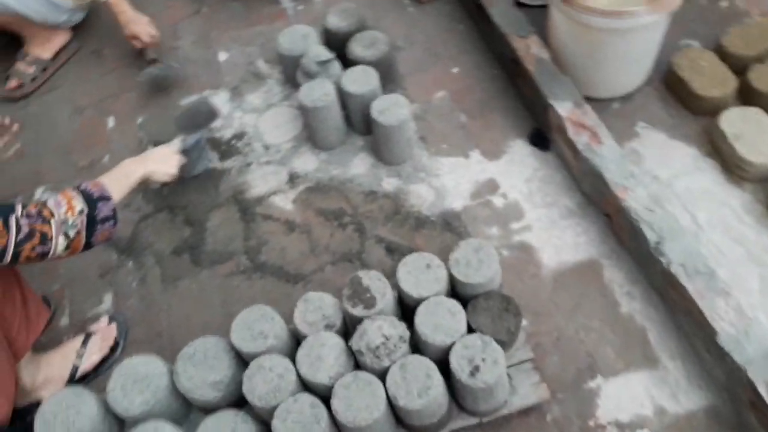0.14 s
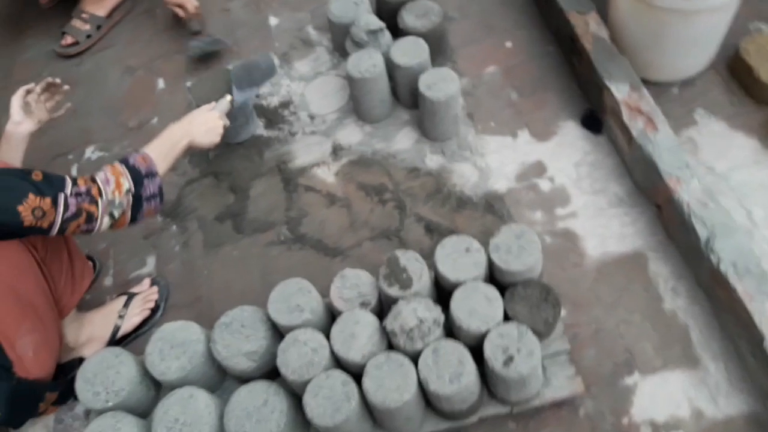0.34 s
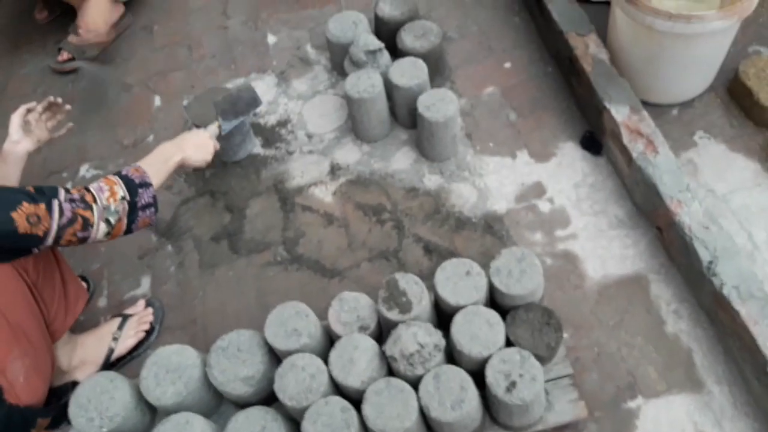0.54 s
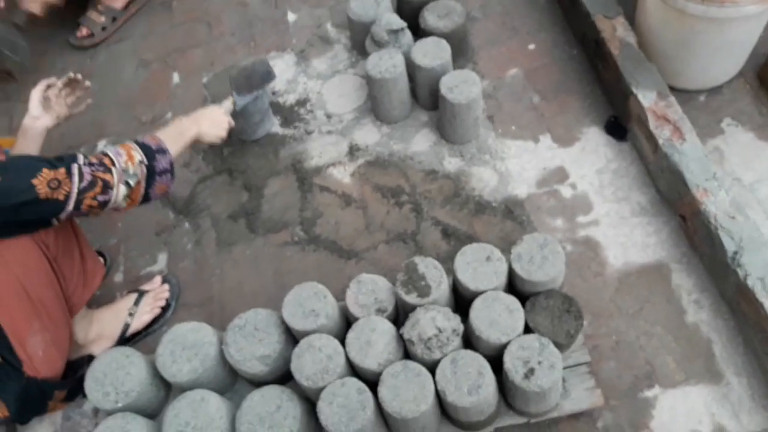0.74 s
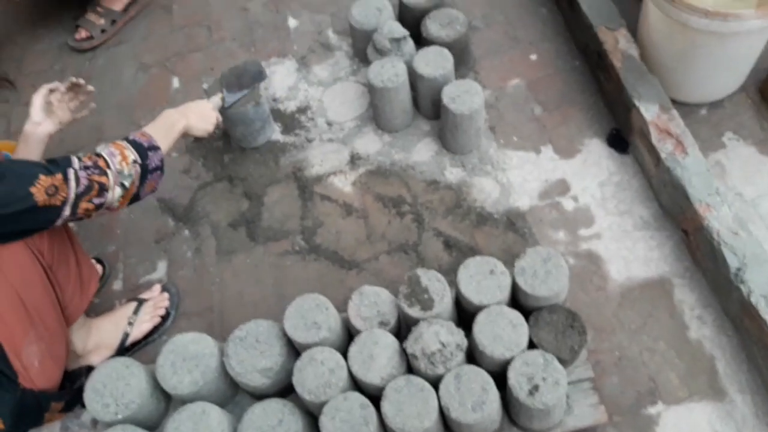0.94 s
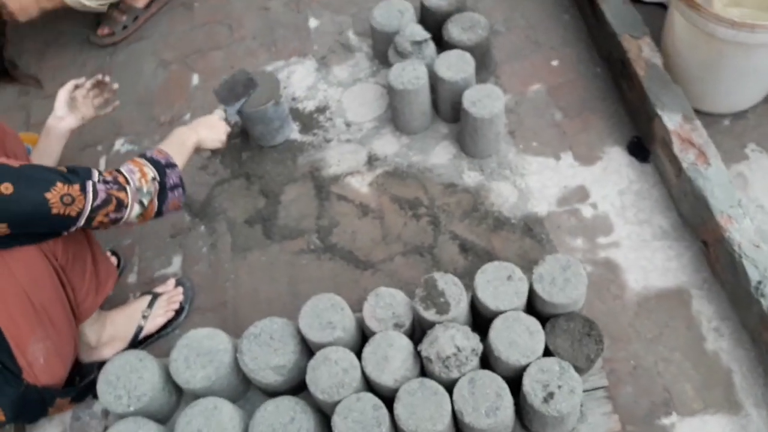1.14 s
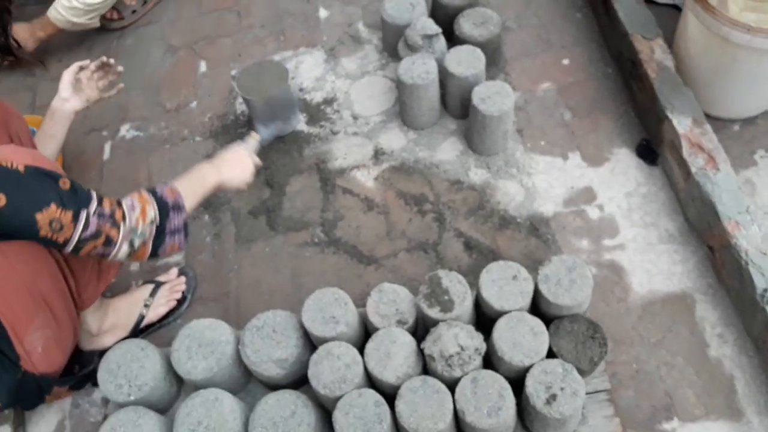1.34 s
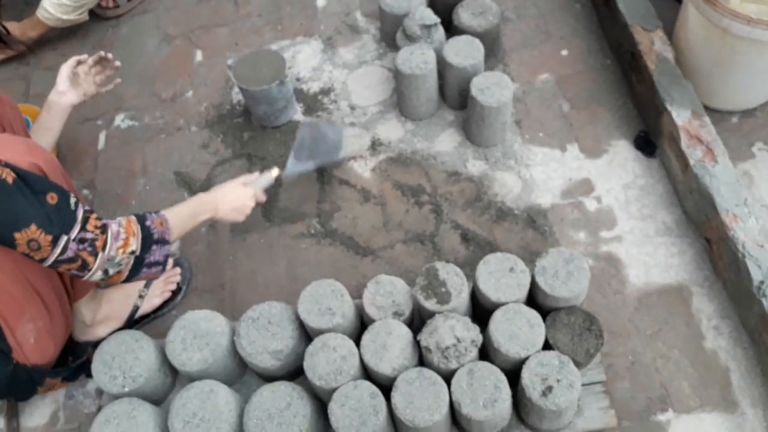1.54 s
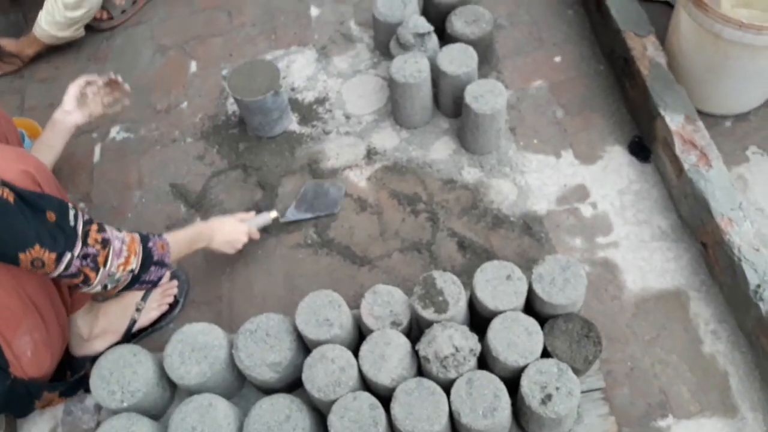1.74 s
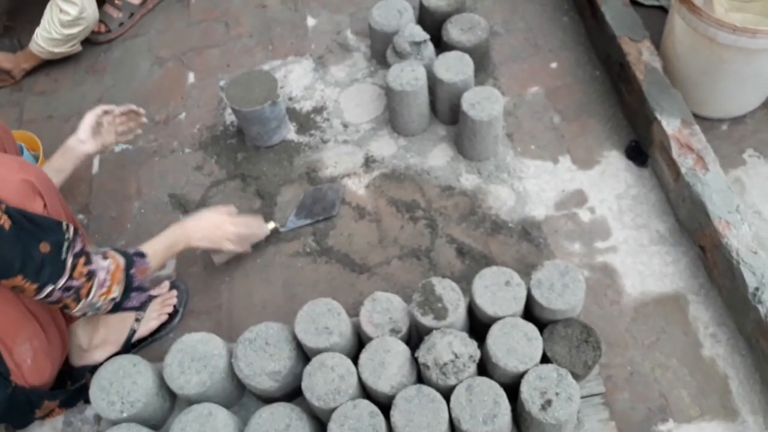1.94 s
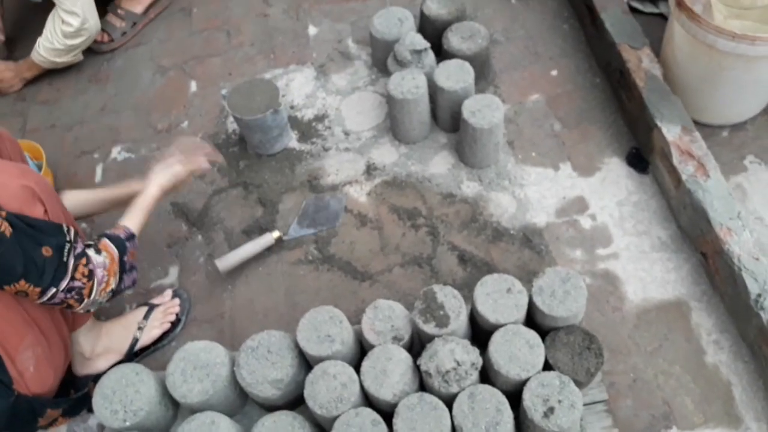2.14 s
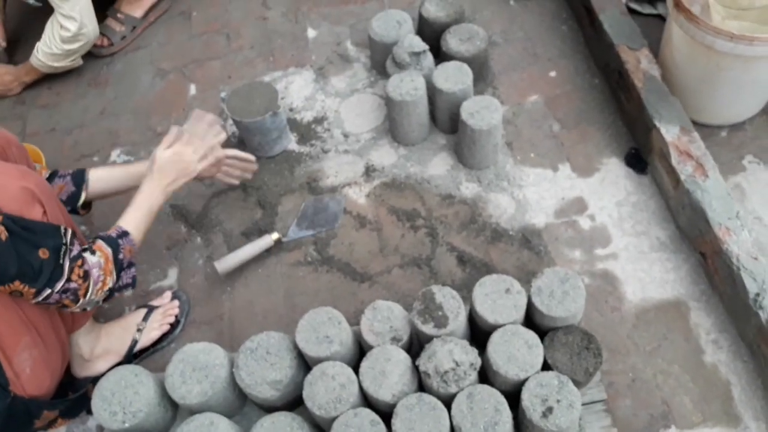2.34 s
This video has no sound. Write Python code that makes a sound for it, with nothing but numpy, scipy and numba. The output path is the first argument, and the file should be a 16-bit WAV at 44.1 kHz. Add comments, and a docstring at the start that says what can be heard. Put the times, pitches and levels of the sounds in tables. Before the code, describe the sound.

A small steel trowel skims gritty cement, strikes a sharp ringing clank with a dull thud, skims softly with light taps, then drags in loud, bright rasps over a sandy floor; close microphone in a small yard.

```python
"""A yard with a gritty hard floor and a mould of damp cement, a small steel trowel working near the microphone.
The blade pats and skims the mould, then is dragged over the floor and let go. Sand grains under its edge
ring its resonances; taps ring it harder, over a knock and a hollow thud; squeals and one squeak sing out.
A short echo of decaying noise follows; a low rumble and yard hiss lie behind.
One microphone, the same on both channels."""
import sys
import numpy as np
from scipy import signal
from scipy.fft import rfft, irfft
from scipy.io import wavfile
from scipy.ndimage import uniform_filter1d
from numba import njit

SR = 44100
rng = np.random.default_rng(int(sys.argv[2]) if len(sys.argv) > 2 else 0)


def wav_record(signal):
    """Record a signal, one row per channel, as 16-bit PCM in the file named by sys.argv[1]."""
    frames = np.transpose(np.atleast_2d(signal))
    bounded = np.clip(frames, -1, 1)
    # unit amplitude maps onto the largest positive 16-bit level
    quanta = np.round(bounded * 32767).astype(np.int16)
    wavfile.write(sys.argv[1], SR, quanta)


N = 110250  # samples, 2.5 s
TIME_S = np.arange(N) / SR


def undb(db):
    """Amplitude ratio of a level in dB."""
    return 10 ** (np.asarray(db) / 20)


def unit(x):
    """Scale a signal to an RMS of 1."""
    return x / np.sqrt(np.mean(x ** 2))


def curve(rows, col):
    """Straight lines over time through one column of a table whose first column is t/s."""
    rows = np.array(rows)
    return np.interp(TIME_S, rows[:, 0], rows[:, col])


def colour(x, points):
    """Shape a spectrum by (f/Hz, gain/dB) points on a log frequency axis; -90 dB outside them."""
    hz = np.fft.rfftfreq(len(x), 1 / SR)
    points = np.array(points)
    gain_db = np.interp(np.log(hz + 1), np.log(points[:, 0]), points[:, 1], -90, -90)
    return irfft(rfft(x) * undb(gain_db), len(x))


def walk(rate):
    """Random levels held 1 / rate s and slewed twice; spread near 1."""
    hold = int(SR / rate)
    levels = rng.standard_normal(N // 100)[:N // hold + 1]
    steps = np.repeat(levels, hold)
    return 1.18 * uniform_filter1d(uniform_filter1d(steps, hold), hold)[:N]


@njit
def ring(x, hz, width):
    """One resonance whose centre may move, as a two-state bandpass; gain 1 at the centre."""
    y, band, low = np.empty(len(x)), 0., 0.
    for i in range(len(x)):
        g, damping = np.tan(np.pi * hz[i] / SR), width / hz[i]
        v = (band + g * (x[i] - low)) / (1 + g * (g + damping))
        band, low, y[i] = 2 * v - band, low + 2 * g * v, damping * v
    return y


def decay(start, t60):
    """Sudden start, then an exponential fall of 60 dB in t60 s."""
    t = TIME_S - start
    return (t >= 0) * np.exp(-np.log(1000) * np.maximum(t, 0) / t60)


def swell(u):
    """Fade in and out as u goes from 0 to 1."""
    return np.sqrt(np.sin(np.pi * u).clip(0))


def split(x):
    """Mids, body and treble of the blade's sound, parted at 2450 and 9000 Hz, each at RMS 1."""
    spectrum, hz = rfft(x), np.fft.rfftfreq(N, 1 / SR)
    low = 1 / (1 + (hz / 2450) ** 12)
    high = 1 / (1 + (9000 / (hz + 1)) ** 12)
    return [unit(irfft(spectrum * gain, N)) for gain in (low, 1 - low - high, high)]


GRAINS_PER_S, GRAIN_SCATTER_DB = 5000, 3
SMOOTH_DB = -7.5  # the smoother rub against the grains


def grit():
    """Dense sand grains of scattered size and random sign, over a smoother rub of white noise."""
    size_db = GRAIN_SCATTER_DB * np.minimum(rng.exponential(size=N), 3)
    struck = rng.random(N) < GRAINS_PER_S / SR
    grains = struck * rng.choice([-1, 1], N) * undb(size_db)
    return unit(unit(grains) + undb(SMOOTH_DB) * rng.standard_normal(N))


FLICKER_PER_S = 20
DRIFT = .003  # spread, as a share of each pitch
CLIMB_HZ = 6000  # tones between this and 9 kHz take the climb


def blade(x, modes, flicker_db, climb=0):
    """Each resonance drifts a little and swells on its own as the contact moves."""
    out = 0
    for k, (f, width_hz, db) in enumerate(modes):
        level = undb(db + flicker_db * walk(FLICKER_PER_S))
        hz = f * (1 + DRIFT * walk(4.5) + climb * (CLIMB_HZ < f < 9000))
        out = out + (-1) ** k * level * ring(x, hz, 1. * width_hz)  # neighbours have opposite sign
    return out


# blade resonances while skimming the mould: [f/Hz, width/Hz, level/dB]
BLADE_FREE = [(1150, 250, -24), (2000, 120, -22), (3130, 140, -9), (3710, 60, -10), (4500, 70, -7),
              (4970, 75, -5), (5390, 50, -9), (5770, 55, -5), (6300, 90, 0), (7050, 200, -9),
              (8150, 100, -19), (11300, 300, -20), (12900, 80, -16), (13700, 200, -10), (14400, 150, -12),
              (15450, 120, -17)]
# blade resonances while pressed on the floor: [f/Hz, width/Hz, level/dB]
BLADE_PRESSED = [(1090, 90, -13), (1420, 160, -15), (2000, 130, -11), (3080, 150, -10), (3440, 120, -7),
                 (3750, 150, -9), (4450, 150, -8), (4910, 180, -6), (6720, 130, -2), (7180, 150, -1),
                 (8770, 200, -19), (9930, 200, -17), (11450, 250, -16), (12800, 300, -15),
                 (14800, 200, -11), (15300, 180, -11)]
# spectrum of the sand's own rasp: [f/Hz, relative level per Hz/dB]
RASP = [(410, -37), (700, -21), (1090, -20), (1700, -18.5), (2540, -11.5), (3340, -7.5), (5540, -5),
        (7010, -4.5), (8300, -20), (14900, -16), (15700, -9.5)]
# spectrum of the dull knock: [f/Hz, relative level per Hz/dB]
KNOCK = [(150, -17.5), (300, 0.5), (560, -6.5), (850, -9.5), (1300, -15), (2000, -61.5)]
# the edge catches on a lump: [t/s, jolt level/dB, bump level/dB]
CATCHES = [(.09, -32, -53), (0.118, -36.5, -50), (.1965, -28.5, -72), (1.244, -26.5, -58),
           (1.314, -25, -42), (1.382, -20.5, -65), (1.5196, -26, -43), (1.64, -27.5, -67),
           (1.727, -14.5, -41), (1.853, -31, -63), (1.932, -16.5, -43), (1.986, -17.5, -53),
           (2.082, -14, -59), (2.147, -21.5, -55)]
# strokes of the edge, one table each: [t/s, level/dB, treble above 9 kHz/dB, ring below 2.4 kHz/dB]
STROKES = [
    [(0.0, -26, -16, -15.5), (0.064, -40.5, -7.5, -6.5), (0.21, -38.5, -7.5, -17)],
    [(0.3, -56, -6, -17), (0.378, -35, -8, -10), (0.49, -67.5, -8, 0)],
    [(0.77, -45, -10.5, -10.5), (0.938, -37.5, -8.5, -12.5), (1.134, -37, -8.5, -16),
     (1.678, -24, -4, -16.5), (2.044, -21.5, -9.5, -19), (2.19, -20.5, -10.5, -21.5), (2.28, -53, -10, -11)],
]
LANDS_S, LANDING_S = 1.43, 0.071  # middle and length of the change from mould to floor
FLICKER_DB, PRESSED_FLICKER_DB = 2.5, 3.5
SKIM_RASP_DB, RASP_DB = -6.5, -3.5  # on the mould, on the floor; against the blade's tones
CLIMB_PER_S = 0.052  # share of the pitch, as the load grows
JUDDER_DB, JUDDER_PER_S = 1, 60
CATCH_S, BUMP_T60_S = .014, 0.21  # jolt's fall to 1/e, bump's fall by 60 dB
LIFT_S = 0.013


def scrape():
    """Grit rings the blade; its tones change when it lands on the floor, and lumps jolt the edge."""
    x = grit()
    on_floor = np.clip((TIME_S - LANDS_S) / LANDING_S + .5, 0, 1)
    climb = CLIMB_PER_S * (TIME_S - 1.8)  # listed pitches are passed at 1.8 s
    pressed = unit(blade(x, BLADE_PRESSED, PRESSED_FLICKER_DB, climb))
    free = unit(blade(x, BLADE_FREE, FLICKER_DB))
    tones = np.sqrt(1 - on_floor) * free + np.sqrt(on_floor) * pressed
    rasp_db = SKIM_RASP_DB + on_floor * (RASP_DB - SKIM_RASP_DB)
    mids, body, treble = split(tones + undb(rasp_db) * unit(colour(grit(), RASP)))

    judder_db = JUDDER_DB * walk(JUDDER_PER_S)
    jolts = sum(undb(db) * decay(s, np.log(1000) * CATCH_S) for s, db, _ in CATCHES)
    jolts = uniform_filter1d(jolts, size=320)  # softens each onset over 7 ms
    bumps = sum(undb(bump_db) * decay(s, BUMP_T60_S) for s, _, bump_db in CATCHES)
    out = unit(colour(x, KNOCK)) * bumps
    for rows in STROKES:
        start, end = rows[0][0], rows[-1][0]
        touch = np.clip(np.minimum(TIME_S - start, end - TIME_S) / LIFT_S + 1, 0, 1)
        force = touch * np.hypot(undb(curve(rows, 1) + judder_db), jolts)
        out = out + force * (body + undb(curve(rows, 2)) * treble + undb(curve(rows, 3)) * mids)
    return out


# blows of the blade: [t/s, level/dB, rattle t60/s, treble/dB, mids/dB, knock level/dB,
#   loudest tone f/Hz, width/Hz of the first of its two filters, tone level/dB];
#   treble, mids and tone are relative to the body
TAPS = [(0.2169, -6.5, 0.13, -9.5, -23.5, -20, 6020, 504, -8.5),
        (0.2232, -11.5, 0.18, -15, -17, -32, 4800, 484, 1.5),
        (0.2382, -17, 0.31, -10, -10, -49, 3200, 600, 4.5),
        (0.5147, -18, 0.2, -10.5, -11, -25.5, 5580, 120, -17),
        (0.7106, -23.5, 0.14, -12, -13, -29.5, 7170, 150, -6),
        (2.3015, -36.5, 0.38, -10, -33, -68, 3760, 150, 0),
        (2.4578, -31.5, 0.013, -19, -29, -35.5, 4870, 1490, 12.5),
        (2.47, -40, 0.15, -1, -23, -49, 4900, 900, 3)]
# modes of mould and ground under the hardest blow: [f/Hz, level against THUD_DB/dB, t60/s]
THUMP = [(110, 10.5, 0.013), (245.5, -5.5, 0.28), (457, -2, 0.045)]
THUD_S, THUD_DB = .2172, -21.5
TAP_TREBLE_HZ, TAP_RASP_DB = 11900.0, 1
TAP_CRACK_S, TAP_TAIL_DB = 0.0041, -12  # crack's fall to 1/e, rattle against the crack
KNOCK_T60_S = 0.058
RING_DB, RING_SHARE = -10.5, 0.34  # against the blow; share of the blade's widths


def taps():
    """A crack and a gritty rattle through the free blade, a dull knock and a hollow thud from below."""
    x = grit()
    tones = unit(blade(x, BLADE_FREE, 4.3))
    mids, body, treble = split(tones + undb(TAP_RASP_DB) * unit(colour(grit(), RASP)))
    treble = unit(ring(treble, np.full(N, TAP_TREBLE_HZ), 7200.0))
    knock = colour(rng.standard_normal(N), KNOCK)
    blows = np.zeros(N)
    thud = sum(undb(db) * decay(THUD_S, t60) * np.sin(2 * np.pi * f * (TIME_S - THUD_S))
               for f, db, t60 in THUMP)
    out = undb(THUD_DB) * thud
    for s, db, t60, treble_db, mids_db, knock_db, hz, width_hz, tone_db in TAPS:
        crack = decay(s, np.log(1000) * TAP_CRACK_S)
        rattle = undb(TAP_TAIL_DB) * decay(s, t60)
        envelope = uniform_filter1d(crack + rattle, size=24)
        centre = np.full(N, 1. * hz)
        tone = ring(rng.standard_normal(N), centre, 1. * width_hz)
        tone = unit(ring(tone, centre, 2. * width_hz))
        steel = body + undb(treble_db) * treble + undb(mids_db) * mids + undb(tone_db) * tone
        out = out + undb(db) * envelope * steel
        first = knock[int(s * SR):int((s + KNOCK_T60_S / 2) * SR)]  # sets the knock's level
        out = out + undb(knock_db) * decay(s, KNOCK_T60_S) * knock / np.std(first)
        blows[int(s * SR)] = undb(db + RING_DB)
    # the steel rings on, its resonances narrower once the edge is off the grit
    for f, width_hz, db in BLADE_FREE:
        narrow_hz = RING_SHARE * width_hz
        impulse_gain = SR / (2 * np.pi * narrow_hz)  # a narrow filter answers an impulse weakly
        hz = f * (1 + DRIFT * walk(5.15))
        out = out + undb(db) * impulse_gain * ring(blows, hz, narrow_hz)
    return out


# one tone of the blade sings out for a moment: [start t/s, length/s, from f/Hz, to f/Hz, level/dB]
SQUEALS = [(1.256, 0.075, 3710, 3740, -32.5), (1.385, 0.11, 4370, 4000, -37),
           (1.395, 0.15, 1583, 1597, -42.5), (1.488, 0.3, 6460, 6800, -26.5),
           (1.54, 0.113, 1310, 1394, -40), (1.524, 0.077, 1141, 1094, -42),
           (1.526, 0.18, 1930, 2008, -45.5), (1.596, 0.15, 1637, 1715, -43.5),
           (1.707, 0.073, 1095, 1100, -40.5), (1.732, 0.069, 1830, 1830, -38),
           (1.854, 0.23, 1076, 1105, -37), (2.007, 0.22, 1966, 2060, -40), (2.016, 0.13, 7100, 7200, -23)]
SQUEAL_WIDTH, SQUEAL_FLICKER_DB = .02, 2  # width of the first filter as a share of the starting pitch


def squeals():
    """Noise through narrow gliding resonances that fade in and out."""
    out, x = 0, rng.standard_normal(N)
    for s, length, from_hz, to_hz, db in SQUEALS:
        u = np.clip((TIME_S - s) / length, 0, 1)
        hz = from_hz + (to_hz - from_hz) * u
        width = SQUEAL_WIDTH * from_hz
        tone = ring(ring(x, hz, width), hz, 4 * width)
        tone = tone / np.std(tone[(u > 0) & (u < 1)])
        out = out + undb(db + SQUEAL_FLICKER_DB * walk(40.07)) * swell(u) * tone
    return out


# partials of a short buzzy squeak: [f/Hz at its middle, level against SQUEAK_DB/dB]
SQUEAK_LINES = [(3130, 1.5), (3350, -4), (3600, -7)]
SQUEAK_START_S, SQUEAK_LENGTH_S, SQUEAK_DB = 2.36, 0.06, -40.5
SQUEAK_SAG = 0.049  # whole fall as a share of the pitch


def squeak():
    """A few close sine partials that sag together and beat into a buzz."""
    u = np.clip((TIME_S - SQUEAK_START_S) / SQUEAK_LENGTH_S, 0, 1)
    phase = 2 * np.pi * np.cumsum(1 - SQUEAK_SAG * (u - .5)) / SR
    partials = sum(undb(db) * np.sin(f * phase) for f, db in SQUEAK_LINES)
    return undb(SQUEAK_DB) * swell(u) * partials


# low rumble: [t/s, level/dB]
RUMBLE = [(0.0, -50), (0.94, -52.5), (1.2, -52), (1.92, -41), (2.5, -41.5)]
# spectrum of the rumble: [f/Hz, relative level per Hz/dB]
RUMBLE_COLOUR = [(25, -32), (112, -1.5), (273, -2.5), (409, -5), (492, -9), (1000, -38.5), (1300, -18),
                 (2200, -120)]
# spectrum of the yard hiss: [f/Hz, relative level per Hz/dB]
YARD = [(500, -0.5), (1150, -11), (2100, -12), (2600, -6.5), (4000, -8.5), (7200, -18.5), (8500, -30),
        (15700, -27)]
RUMBLE_FLICKER_DB = -1
YARD_DB = -54.5  # where the rumble is lowest
YARD_FOLLOWS = 1  # share of the rumble's swell in dB


def background():
    """Uneven low rumble and faint hiss, both shaped noise, that swell together."""
    level_db = curve(RUMBLE, 1)
    rumble = unit(colour(rng.standard_normal(N), RUMBLE_COLOUR))
    rumble = rumble * undb(level_db + RUMBLE_FLICKER_DB * walk(9.2))
    hiss_db = YARD_DB + YARD_FOLLOWS * (level_db - level_db.min())
    return rumble + unit(colour(rng.standard_normal(N), YARD)) * undb(hiss_db)


ECHO_DB, ECHO_T60_S = -9, 0.075


def echo(near):
    """The walls answer after 3.3 ms with a dense decaying noise."""
    walls = rng.standard_normal(N) * decay(0.0033, ECHO_T60_S)
    walls = walls[:SR // 2] / np.sqrt(np.sum(walls ** 2))
    return undb(ECHO_DB) * signal.fftconvolve(near, walls)[:N]


def scene():
    """The trowel near the microphone, its echo and the yard behind, the same on both channels."""
    near = scrape() + squeals() + taps() + squeak()
    return np.tile(near + echo(near) + background(), (2, 1))


TOP_HZ = 15800


def record(dry):
    """The recorder rounds the highest peaks, thins the deep bass and cuts the top."""
    bass_cut = signal.butter(4, 52, "high", fs=SR, output="sos")
    top_cut = signal.ellip(14, .3, 95, TOP_HZ, fs=SR, output="sos")
    thin = signal.sosfilt(bass_cut, np.tanh(dry))
    return signal.sosfilt(top_cut, thin)


dry = scene()
out = record(dry)
wav_record(out)
```